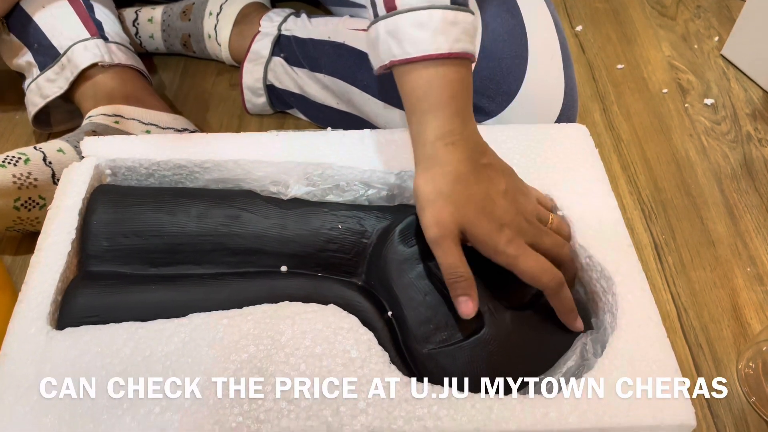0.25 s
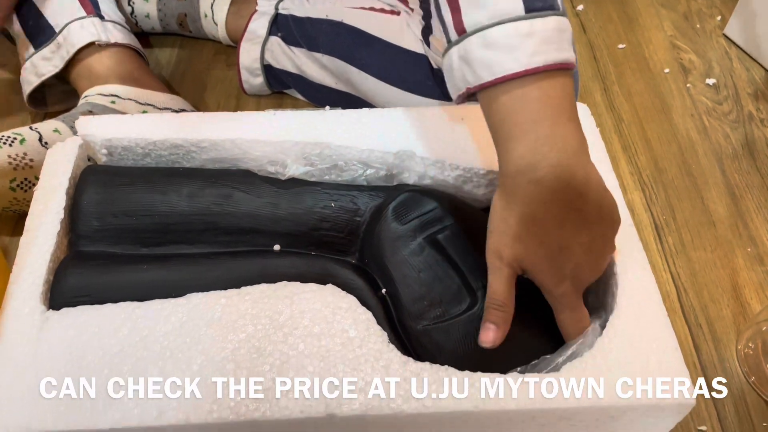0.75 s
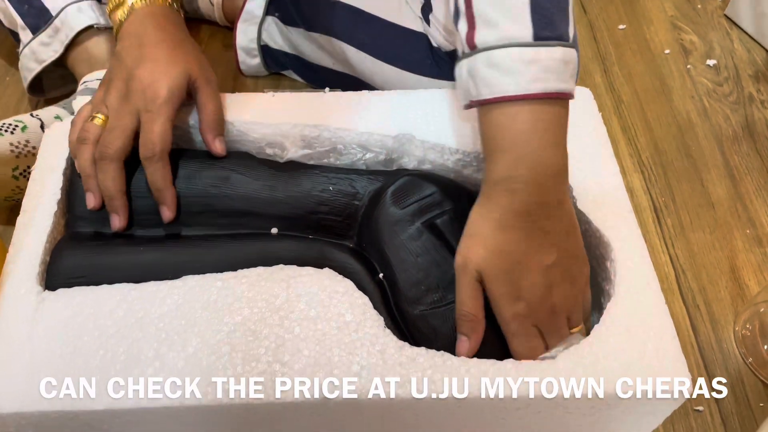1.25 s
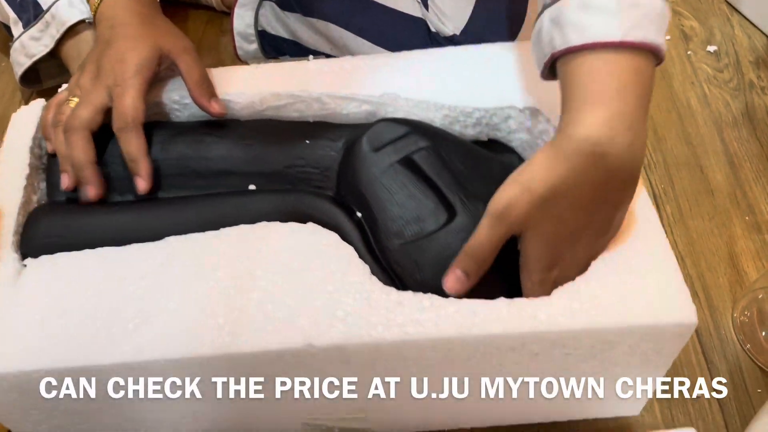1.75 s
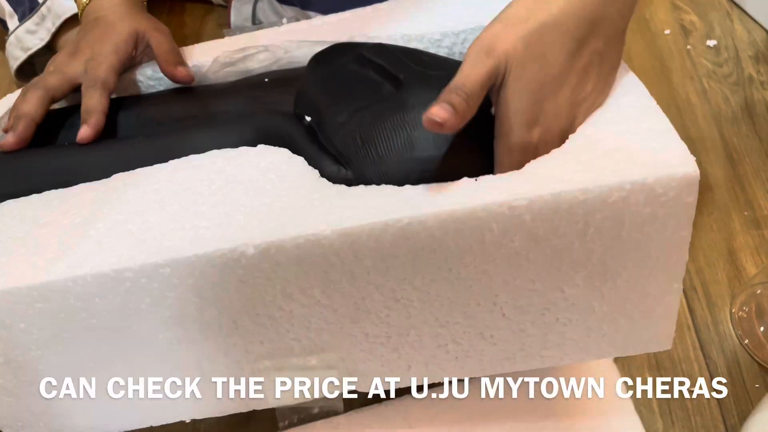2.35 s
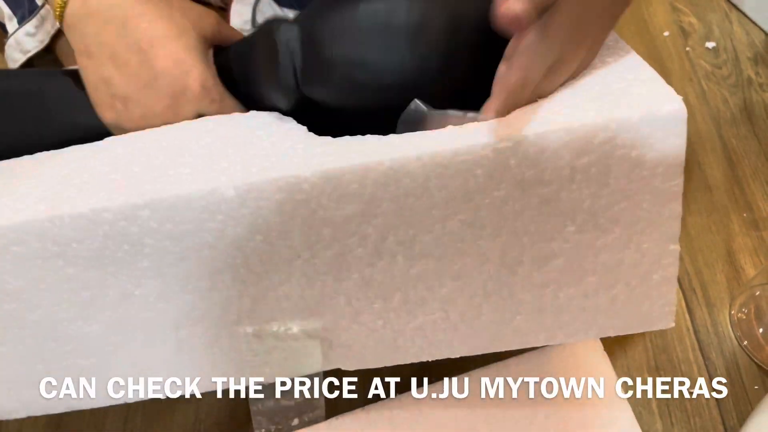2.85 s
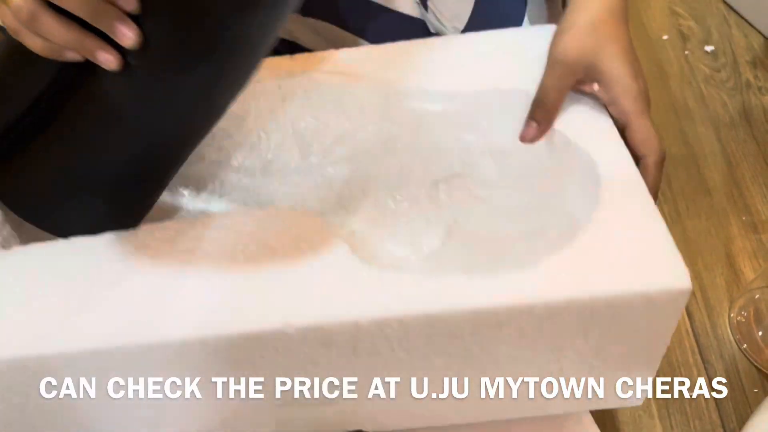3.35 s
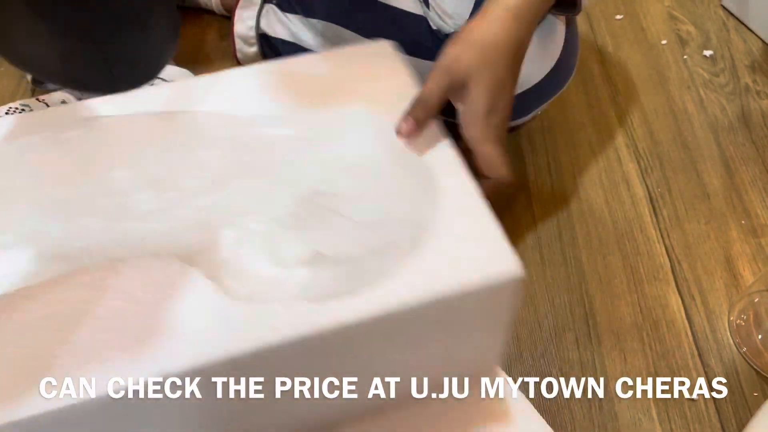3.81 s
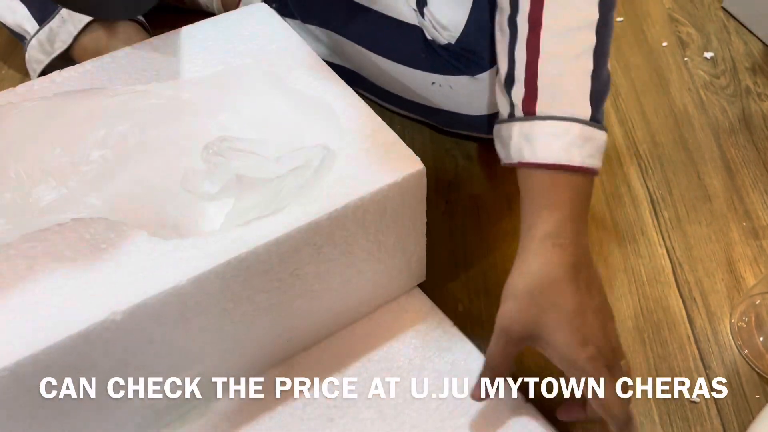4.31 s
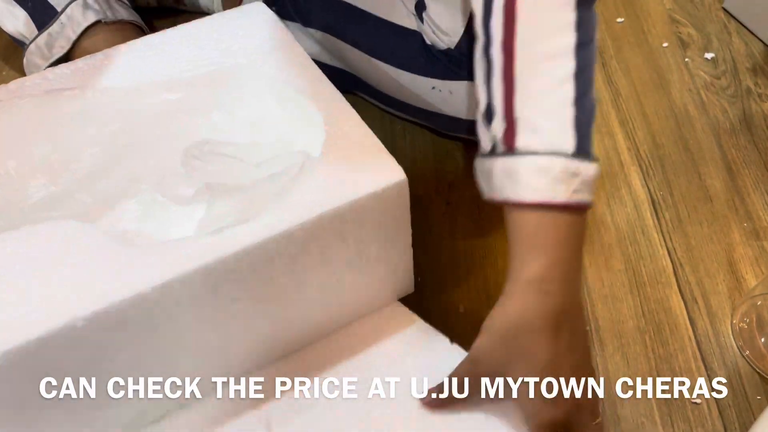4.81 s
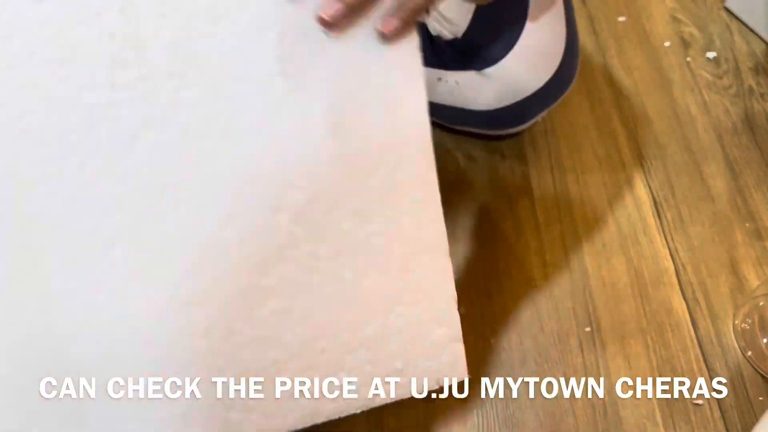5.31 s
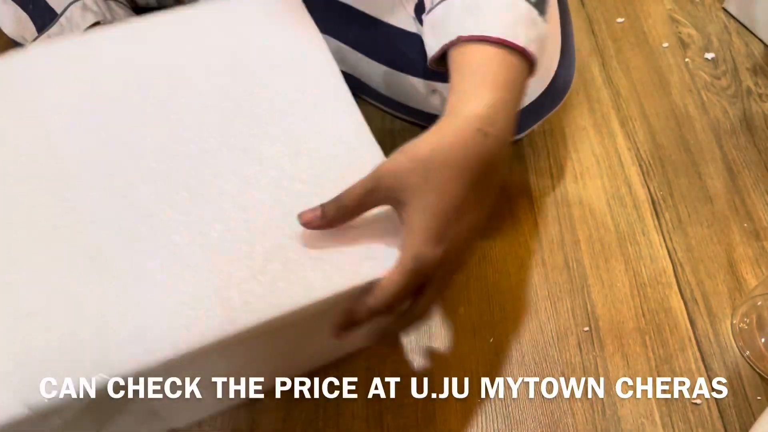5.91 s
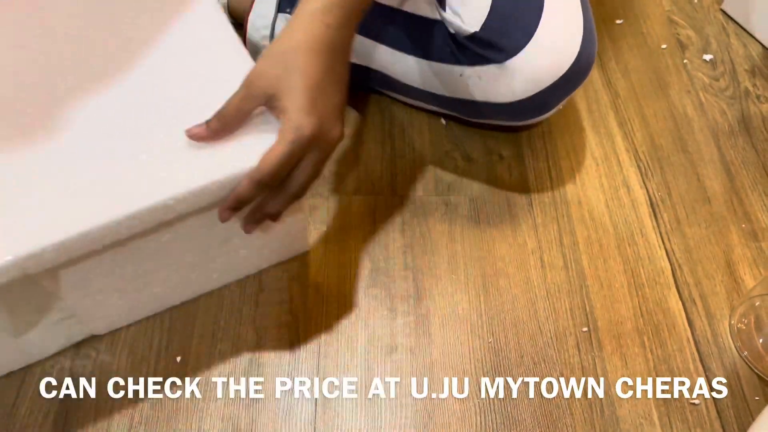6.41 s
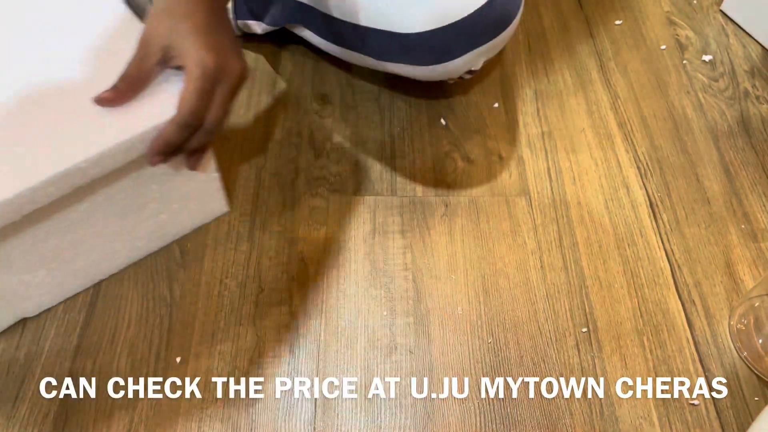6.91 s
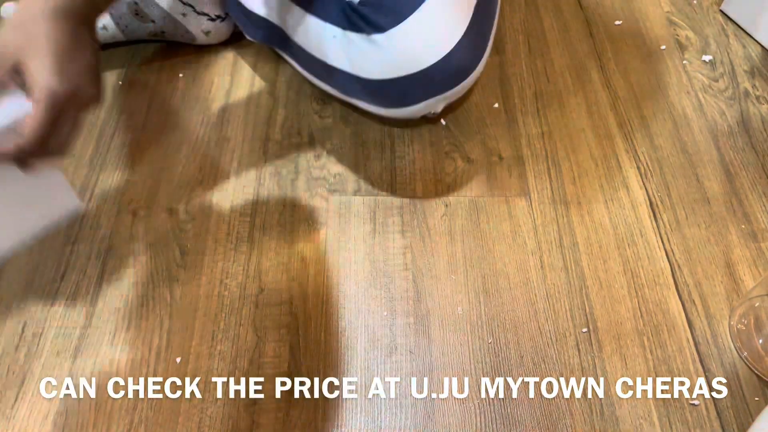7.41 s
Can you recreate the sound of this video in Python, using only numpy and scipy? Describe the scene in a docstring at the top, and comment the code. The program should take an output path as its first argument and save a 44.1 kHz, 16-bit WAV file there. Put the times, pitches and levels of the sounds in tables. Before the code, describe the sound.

Close by in a quiet room, a carving drags against its tight polystyrene packing with dry hissing scrapes and a few ticks of foam and plastic wrap. Sharp jerks and a quick cluster of rough squeaks make the loudest stretch. The handling then turns quieter, with light rubs and faint squeaks as the lid is laid on. Finally the box is pushed away, rumbling and bumping dully on the floorboards.

```python
"""Unpacking a carving from foam

A heavy carving is worked out of a polystyrene box on a wooden floor, close by in a quiet room.
Friction makes countless foam beads slip: they hiss and drive the resonances of the block and the air
in the box. Stick-slip motion against the carving gives jerks and squeaks. A lid is laid on and the
box is slid away, with a low rumble and soft thuds that ring the floorboards."""
import sys
import numpy as np
from scipy import signal
from scipy.fft import rfft, irfft, next_fast_len
from scipy.io import wavfile
from scipy.ndimage import uniform_filter1d, map_coordinates

SR = 44100
rng = np.random.default_rng(int(sys.argv[2]) if len(sys.argv) > 2 else 0)


def pcm_store(signal):
    """Save signal as 16-bit PCM."""
    levels = np.round(np.clip(np.atleast_2d(signal), -1, 1) * 32767)
    wavfile.write(sys.argv[1], SR, levels.astype(np.int16).T)


N = 337850

# Foam sliding on the carving, lid or floor:
# start_s, end_s, first_hiss_db, last_hiss_db, block_over_hiss_db, hollow_over_hiss_db
STROKES = [(0, 0.063, -39.5, -56.5, 0, -2), (0.08, 0.21, -41, -49, -1, -1),
           (0.221, 0.267, -41, -37.5, -1, -10), (0.271, 0.45, -35.5, -43, -2.5, -5.5),
           (0.464, .55, -40.5, -48, 1, -2.5), (0.557, 0.654, -41, -48, 2.5, 1),
           (0.667, .775, -38.5, -46.5, -0.5, -3), (.785, 0.936, -45, -40, -1.5, -6),
           (.95, 1.048, -47, -41, 0.5, -3), (1.052, 1.239, -31, -41.5, -5.5, -4),
           (1.234, 1.342, -36, -48, -3.5, -4.5), (1.341, 1.412, -40, -32, 1.5, -8.5),
           (1.426, 1.5, -40, -42, 1.5, -0.5), (1.513, 1.582, -38.5, -33.5, -4, -4),
           (1.588, 1.676, -30.5, -37, -1, -2), (1.674, 1.91, -37, -27, -2, -4),
           (1.934, 1.981, -41.5, -38.5, 5.5, 5), (1.983, 2.045, -31.5, -25.5, 7, -1),
           (2.058, 2.165, -31, -30.5, 0, -1), (2.173, 2.235, -31.5, -28.5, -2.5, -3.5),
           (2.235, 2.443, -25, -28, -4.5, -13.5), (2.457, 2.578, -25.5, -26, -7, -13.5),
           (2.588, 2.635, -38, -46, -3, -7), (2.639, 2.806, -24, -24, -10.5, -18),
           (2.812, 2.987, -33, -37.5, -3, -9.5), (2.993, 3.152, -40, -33.5, -6, -9),
           (3.154, 3.254, -32, -43.5, -8.5, -9.5), (3.29, 3.478, -40.5, -59.5, -5, -7.5),
           (3.488, 3.635, -59.5, -48.5, 1.5, -6.5), (3.631, 3.801, -44.5, -44.5, -6, -7.5),
           (3.794, 3.968, -42.5, -49, -4.5, -0.5), (3.986, 4.164, -51, -70, -1.5, 0.5),
           (4.175, 4.3, -48.5, -47, -7, -7.5), (4.298, 4.37, -55, -56.5, -5, -6.5),
           (4.373, 4.5, -65.5, -81, 2.5, 6), (4.596, 4.679, -52, -32.5, -9.5, -12.5),
           (4.68, 4.781, -34.5, -34, -8.5, -12.5), (4.79, 4.853, -46, -47.5, -3.5, -5),
           (4.859, 4.938, -42.5, -39, -8.5, -11.5), (4.95, 5.048, -50.5, -55, -2, -11),
           (5.071, 5.215, -51.5, -58, -2, -8), (5.225, 5.293, -54, -55.5, -1, -4),
           (5.333, 5.467, -47.5, -44, -8, -13), (5.462, 5.705, -45, -75.5, -2.5, -1),
           (5.87, 5.93, -50.5, -48.5, -8.5, -3.5), (5.925, 6.056, -39, -46, -5.5, 1.5),
           (6.065, 6.31, -53, -48.5, -2.5, -4.5), (6.298, 6.4, -47, -38.5, -4.5, 0),
           (6.405, 6.678, -41.5, -57.5, -2, 1), (6.677, 6.765, -44.5, -46.5, -6.5, -7.5),
           (6.77, 6.904, -48, -45, -7.5, -5.5), (6.902, 6.997, -42, -45.5, -7, -7),
           (7.0, 7.049, -44, -37.5, -10, 1), (7.068, 7.167, -44, -39, -11, -9.5),
           (7.175, 7.332, -47.5, -46.5, -8, -7), (7.323, 7.552, -45, -35, -5, -2.5),
           (7.552, 7.66, -37, -46.5, -4, -5.5)]
# A bead or a fold of wrap snaps: start_s, level_db, body_over_hiss_db
TICKS = [(0.082, -27.5, -12), (0.09, -27, -11), (0.127, -11.5, -8), (0.2209, -17.5, -1), (0.3868, -25, -21),
         (0.576, -27.5, -1), (0.6707, -23, -1), (0.7894, -27, -12), (0.8096, -35.5, -4),
         (1.0619, -18.5, -4), (1.246, -35.5, -3.5), (2.641, -14.5, -6.5), (3.306, -30.5, -12),
         (3.348, -39, -8.5), (4.127, -47, 5.5), (5.816, -48, -10), (6.05, -31, -13), (6.4183, -33.5, -8),
         (7.4185, -46, -3)]
# The grip builds and lets go: peak_s, hiss_db, body_over_hiss_db, rise_ms, t60_ms
SURGES = [(.577, -39.5, 8.5, 10, 40), (1.066, -30.5, -2.5, 40, 55), (1.082, -28.5, -5, 13, 120),
          (1.146, -38, 3.5, 8, 63), (1.365, -42, 1, 15, 120), (1.58, -26.5, -14.5, 18, 41),
          (1.893, -23.5, 0, 24, 77), (1.912, -27.5, 9, 11, 20), (2.038, -17, -3, 27, 50),
          (2.078, -18.5, 2, 18, 40), (2.174, -16.5, -2, 7.5, 51), (2.208, -19.5, -1.5, 24, 27),
          (2.232, -17, -2, 5, 25), (2.248, -20.5, -3, 10, 77), (2.273, -19.5, -2.5, 14, 43),
          (2.298, -23, -5.5, 6, 30), (2.478, -35.5, -8.5, 23, 130), (3.57, -51.5, 3.5, 19, 77),
          (3.807, -42, 3.5, 3, 69), (3.973, -33.5, -8.5, 11, 45), (4.187, -47.5, -5.5, 4.3, 160),
          (4.25, -42, -9, 8, 60), (4.29, -44.5, -7, 6, 73), (4.606, -49, -2.5, 4, 150),
          (4.628, -44, -8.5, 5.7, 150), (5.085, -48, -3, 8.7, 550), (5.24, -48.5, -13, 22, 230),
          (5.345, -55, 1, 6.6, 220), (5.883, -46.5, -8, 12, 95), (6.688, -47, -20, 4.1, 480),
          (7.45, -34.5, -9, 7.8, 100), (.858, -39, 0, 15, 180), (1.984, -28.5, 1.5, 4.4, 150),
          (4.69, -38.5, -11.5, 39, 93), (4.775, -39, -10.5, 34, 30), (4.803, -33.5, -15, 7.3, 34),
          (4.94, -40, -5, 71, 22), (5.482, -35, -9.5, 31, 69), (5.938, -28.5, -16, 17, 72),
          (5.998, -34.5, 1.5, 13, 71), (6.355, -41.5, -3.5, 32, 100), (7.055, -43, -0.5, 41, 33),
          (7.55, -29.5, -17.5, 30, 51)]
# Lift of the top of the hiss: time_s, gain_db
TREBLE_LIFT = [(0, -1), (.24, -5), (.4, 4), (1.2, 2), (1.45, -2), (2.1, -1), (2.37, 8), (2.7, 4),
               (2.88, -4), (3.3, 3), (3.9, 3), (4.25, 7), (4.76, 2), (5.4, 10), (5.7, 4), (6.1, 4),
               (6.33, 11), (6.45, 5), (6.69, 14), (6.8, 4), (7.1, 7), (7.66, 6)]
# How hard the foam grips: time_s, rasp_over_hiss_db
GRIP_STRENGTH = [(2.16, -20), (2.26, -12), (2.34, -5), (2.4, -13), (2.5, -8), (2.64, -16), (2.73, -6),
                 (2.77, -16), (3.0, -12), (3.12, -7), (3.25, -16), (3.4, -40), (4.55, -40), (4.65, -14),
                 (4.95, -14)]
# Resonances of gripped foam, the foam block and the air in the box: centre_hz, width_hz, gain_db
GRIP_MODES = [(2500, 130, -3), (2950, 150, -3), (3580, 110, -7), (4120, 280, 2), (4800, 90, -7),
              (5420, 170, -3), (6600, 180, -4)]
BLOCK_MODES = [(830, 101, 3.5), (1170, 286, 4.5), (1427, 336, 2.5), (1720, 71, -1)]
HOLLOW_MODES = [(278.7, 68, 1.5), (441, 212, 0), (664, 324, -2.5)]
# Stick-slip squeaks: start_s, end_s, first_pitch_hz, last_pitch_hz, level_db, overtones_db, roughness
SQUEAKS = [(.825, 0.92, 1424, 1360, -42, -8, 0.95), (1.558, 1.604, 861, 867, -32, -6, 0.38),
           (2.185, 2.212, 1098, 1050, -20.5, -1, 0.45), (2.242, 2.262, 1250, 1200, -20, -6, .7),
           (2.262, 2.3, 1400, 1330, -20, -2, .6), (2.305, 2.348, 1310, 1345, -20, 0, .42),
           (2.347, 2.37, 1377, 1480, -25.5, 0.5, 0.42), (2.362, 2.402, 1483, 1470, -25, -1.5, 0.13),
           (2.4, 2.434, 1470, 1400, -37, -2, 1), (2.465, 2.487, 1335, 1400, -31.5, -1, .6),
           (2.482, 2.505, 1473, 1480, -24.5, 0.5, 0.28), (2.504, 2.551, 1390, 1261, -28.5, 0, .55),
           (2.547, 2.579, 1430, 1386, -29, -2.5, 0.48), (2.64, 2.675, 1330, 1895, -26.5, -3, 0.17),
           (2.668, 2.71, 2095, 2180, -27.5, -3, 0.3), (2.703, 2.726, 2300, 2544, -29, -6.5, 0.2),
           (2.712, 2.742, 1850, 1710, -34, 3, .5), (2.743, 2.778, 1665, 1714, -28, -5.5, 0.5),
           (2.773, 2.794, 2050, 2220, -29.5, -7, 0.2), (2.788, 2.822, 2520, 2533, -29, -7.5, 0.1),
           (2.67, 2.727, 817, 830, -32, -8, .7), (2.75, 2.777, 856, 800, -34, -13, 0.5),
           (2.785, 2.812, 796, 844, -31, -10, 0.6), (2.84, 2.862, 783, 725, -29.5, -11, 0.36),
           (2.865, 2.9, 479, 447, -37.5, 1, 0.63), (2.895, 2.905, 800, 815, -28, -17, 0.3),
           (2.915, 2.947, 808, 798, -38, -14, 0.8), (3.018, 3.045, 830, 830, -36, -10, .6),
           (3.09, 3.16, 2600, 2650, -43, -10, .95), (3.18, 3.245, 830, 830, -44, -10, .6),
           (3.545, 3.619, 1136, 1064, -48.5, -4.5, 0.61), (4.645, 4.725, 805, 783, -47, -6, 0.9),
           (4.72, 4.788, 811, 774, -43, 1, 0.67), (4.905, 4.937, 777, 775, -47.5, -6, 0.4)]
# Harmonics of the slip pulse: harmonic_number, level_db
SLIP_OVERTONES = [(2, -5), (3, -4), (4, -13), (5, -13)]
# Blows on the floor: start_s, peak_db, hardness_db_per_octave
THUDS = [(.124, -36, 12), (1.405, -24, -4), (3.292, -38.5, -3), (3.56, -44, -6), (3.806, -39, 5),
         (3.958, -30, -10), (5.365, -41, -6), (5.49, -36.5, 6), (5.931, -32.5, -1), (5.995, -35, 3),
         (6.418, -33.5, 12), (7.125, -39, -1), (7.173, -33, 3), (7.344, -37, 3), (7.444, -28.5, -2.5),
         (7.545, -17.5, 0), (7.596, -28, 0)]
# Modes of the floor and box: pitch_hz, level_db, t60_s
BOARD_MODES = [(76.4, 1, .13), (99.8, -7, 0.16), (147.4, -2, 0.093), (235.5, -4, 0.071), (320, -7, 0.049)]
# The lifted hollow carving rings once: start_s, pitch_hz, level_db, t60_s
CARVING_HUM = (3.345, 156, -47, .6)
# Floor rumble under the moving box: time_s, level_db
RUMBLE_LEVEL = [(0, -46), (.6, -49.5), (1.2, -45.5), (1.5, -46.5), (2.25, -49), (2.6, -58.5), (3.3, -60.5),
                (3.8, -53.5), (4.4, -57), (5.2, -56.5), (5.7, -58.5), (6.0, -57), (6.35, -53), (6.6, -54.5),
                (6.9, -51), (7.3, -52), (7.5, -42), (7.66, -39.5)]
# Spectral shapes of the rumble and of the quiet room: frequency_hz, density_db
RUMBLE_SPECTRUM = [(15, -48), (25, -13.5), (64, -1), (92, 3.5), (276, -8), (332, -11.5), (400, -16.5),
                   (520, -14), (880, -120)]
HUSH_SPECTRUM = [(88, -27.5), (150, -3.5), (187, -17.5), (319, -17), (372, -12), (506, -14), (1280, -20),
                 (3000, -35), (9000, -53.5), (11700, -75.5), (19800, -120)]
# Reverberation, scaled for each source: frequency_hz, base_t60_s
ROOM_DECAY = [(200, 0.25), (2000, 0.34), (10000, 0.068)]
# Colour of left plus right (mid) and left minus right (side): frequency_hz, gain_db
MID_COLOUR = [(700, -89.5), (1300, -7), (1900, 1.5), (3300, 1), (4200, 3), (6700, -1.5), (7500, -4.5),
              (7800, -45.5), (8700, -25.5), (9200, -9), (10900, -6), (13600, -13.5), (14100, -44),
              (16500, -48)]
SIDE_COLOUR = [(700, -92.5), (1300, -0.5), (1900, 8), (2400, -1), (3550, -0.5), (5200, -0.5), (6000, -2.5),
               (7900, 2.5), (10100, -6), (10600, -29), (12700, -30), (13300, -9), (15700, -5),
               (16200, -34.5)]
# Direct sound in the side signal: frequency_hz, signed_share
DIRECT_SHARE = [(300, -.15), (600, .2), (1200, 0), (2400, .5), (4500, .6), (6500, .3), (9000, 0)]
# Stereo width of low sounds: frequency_hz, side_over_mid_db
LOW_WIDTH = [(60, -19), (125, -13), (250, -14), (500, -11), (1000, -7), (1900, -3)]

TAKE_HOLD_S, LET_GO_T60_S = .016, .08
TICK_RISE_MS, TICK_T60_MS = 1.5, 16
TREBLE_FROM_HZ, TOP_HZ = 8200, 16300


def rubbing():
    """Friction noise: bead slips radiate hiss directly and force the block and box at their resonances."""
    sliding, block, hollow = stroke_envelopes()
    jerk_power, body_power = jerk_powers()
    hiss = np.sqrt(sliding ** 2 + jerk_power)
    block = np.sqrt(block ** 2 + body_power)
    hollow = np.sqrt(hollow ** 2 + amp(-11) * body_power)
    return foam_hiss(hiss, sliding) + box_resonance(block, hollow)


def stroke_envelopes():
    """Incoherent sources add in power: overlapping strokes give hiss, block and hollow amplitudes."""
    power = np.zeros((3, N))
    for start, end, first_db, last_db, block_db, hollow_db in STROKES:
        span = slice(max(round((start - TAKE_HOLD_S / 2) * SR), 0), round((end + LET_GO_T60_S) * SR))
        t = np.arange(N)[span] / SR
        release_db = 60 * np.maximum(t - end, 0) / LET_GO_T60_S
        level_db = np.interp(t, [start, end], [first_db, last_db]) - release_db
        force = np.clip((t - start) / TAKE_HOLD_S + .5, 0, 1) * amp(level_db)
        power[:, span] += (amp([[0], [block_db], [hollow_db]]) * force) ** 2
    stutter = amp(-2 + wobble(60))
    return np.sqrt(power) * stutter


def jerk_powers():
    """Stress builds linearly and relaxes exponentially: hiss and body power of ticks and surges."""
    power = np.zeros((2, N + 2 * SR))
    lead = SR // 10
    t_ms = 1000 * np.arange(-lead, SR // 3) / SR
    ticks = [(start + .001, db - 6.5, body_db, TICK_RISE_MS, TICK_T60_MS) for start, db, body_db in TICKS]
    for peak_s, db, body_db, rise_ms, t60_ms in ticks + list(SURGES):
        shape = np.clip(1 + t_ms / rise_ms, 0, 1) * amp(-60 * np.maximum(t_ms, 0) / t60_ms)
        first = round(peak_s * SR) + SR - lead
        power[:, first:first + len(t_ms)] += (amp([[db], [db + body_db]]) * shape) ** 2
    return power[:, SR:SR + N]


def bead_slips(spread_db, patchy_db):
    """Superposition of countless uneven slips gives noise with shifting patches of colour."""
    slips = rng.standard_normal(N) * amp(spread_db * wobble(900))
    spectrum = signal.stft(slips, nperseg=256)[2]
    patches = uniform_filter1d(rng.standard_normal(spectrum.shape), 3, axis=0)
    patches = unit(uniform_filter1d(patches, 8, axis=1))
    return unit(signal.istft(spectrum * amp(patchy_db * patches), nperseg=256)[1][:N])


def foam_hiss(level, sliding):
    """Direct radiation from the beads is broadband; tightly gripped foam adds a resonant rasp."""
    t = np.arange(N) / SR
    gripping = (t > GRIP_STRENGTH[0][0]) & (t < GRIP_STRENGTH[-1][0])
    grip = sliding * amp(over_time(GRIP_STRENGTH)) * gripping
    lift = amp(over_time(TREBLE_LIFT)) - 1
    paths = []
    for _ in range(2):
        slips = bead_slips(spread_db=1.5, patchy_db=2.5)
        treble = filtered(slips, lambda hz: hz > TREBLE_FROM_HZ)
        paths.append(level * (slips + lift * treble) + grip * ring(slips, GRIP_MODES))
    paths[0] += amp(-14.5) * reverb(paths[0], t60_scale=1.28)
    return stereo(*paths, lambda hz: along(MID_COLOUR, hz) + 5, lambda hz: along(SIDE_COLOUR, hz) + 2.3)


def box_resonance(block, hollow):
    """Forced vibration: slip noise excites the modes of the foam block and the enclosed air."""
    paths = []
    for _ in range(2):
        slips = bead_slips(spread_db=3, patchy_db=2.2)
        paths.append(block * ring(slips, BLOCK_MODES) + hollow * ring(slips, HOLLOW_MODES))
    paths[0] += amp(-15) * reverb(paths[0], t60_scale=.72)
    return low_stereo(*paths)


def squeaking():
    """Stick-slip oscillation makes a harmonic pulse train, ragged and raspy where the contact is rough."""
    tone, rasp = np.zeros((2, N))
    waver = wobble(110) + .8 * wobble(500)
    flutter, grit = wobble(220), rng.standard_normal(N)
    for start, end, first_hz, last_hz, db, overtones_db, roughness in SQUEAKS:
        span = slice(round(start * SR), round(end * SR))
        progress = np.linspace(0, 1, span.stop - span.start)
        glide_hz = first_hz + (last_hz - first_hz) * progress
        slip_hz = glide_hz * (1 + .05 * (roughness + .1) * waver[span])
        phase = 2 * np.pi * np.cumsum(slip_hz) / SR
        arch = np.sin(np.pi * progress) ** .4
        force = np.sqrt(2) * amp(db + 4 * (roughness + .2) * flutter[span]) * arch
        overtones = sum(amp(level + overtones_db) * np.cos(k * phase) for k, level in SLIP_OVERTONES)
        tone[span] -= force * (np.cos(phase) + overtones)
        rasp[span] += force * amp(overtones_db) * (1 + np.cos(phase)) * grit[span]  # slips tear beads
    squeak = filtered(tone, lambda hz: 1 + .5 * np.abs(resonance(GRIP_MODES, hz)))
    squeak += amp(1.5) * filtered(rasp, lambda hz: resonance(GRIP_MODES, hz))
    near = squeak + amp(-9.5) * reverb(squeak, t60_scale=1)
    mid_db = lambda hz: np.minimum(along(MID_COLOUR, np.maximum(hz, 6000)) + 6, 0)
    side_db = lambda hz: np.minimum(along(LOW_WIDTH, hz), along(SIDE_COLOUR, np.maximum(hz, 6000))) - 1.5
    return stereo(near, reverb(squeak, t60_scale=.15), mid_db, side_db)


def thuds_and_hum():
    """Free vibration: harder blows favour the boards' upper modes; the carving rings in a single mode."""
    sound, t = np.zeros(N + SR), np.arange(SR // 2) / SR
    lowest_hz = BOARD_MODES[0][0]
    for start, peak_db, hardness in THUDS:
        thud = np.zeros(len(t))
        for hz, db, t60 in BOARD_MODES:
            tilt_db = hardness * np.log2(hz / lowest_hz)
            thud += damped_mode(t, hz, db + tilt_db + rng.normal(0, 1.5), t60)
        sound[round(start * SR):][:len(t)] += amp(peak_db) * thud / np.abs(thud).max()
    start, hz, db, t60 = CARVING_HUM
    sound[round(start * SR):][:len(t)] += damped_mode(t, hz, db, t60)
    return low_stereo(sound[:N], amp(-7) * reverb(sound[:N], t60_scale=.5))


def floor_rumble():
    """Structure-borne noise: the moving box shakes the floor at low frequencies."""
    return amp(over_time(RUMBLE_LEVEL) - 1 + 2.6 * wobble(12)) * coloured_noise(RUMBLE_SPECTRUM)


def room_hush():
    """Stationary noise forms the faint background of the room."""
    return amp(-67.5) * coloured_noise(HUSH_SPECTRUM)


def amp(db):
    """Amplitude ratio of a level in decibels."""
    return 10 ** (np.asarray(db) / 20)


def unit(x):
    """Normalisation to an rms of 1."""
    return x / np.sqrt(np.mean(x ** 2) + 1e-20)


def along(points, hz):
    """Interpolation on a logarithmic frequency axis."""
    knots_hz, values = np.transpose(points)
    return np.interp(np.log(hz + 1), np.log(knots_hz + 1), values)


def over_time(points):
    """Linear interpolation in time, one value per sample."""
    return np.interp(np.arange(N) / SR, *np.transpose(points))


def wobble(rate_hz):
    """Smooth random modulation: a spline through rate_hz knots a second."""
    knots = rng.standard_normal(int(N * rate_hz / SR) + 4)
    return map_coordinates(knots, [np.arange(N) * rate_hz / SR])


def filtered(x, response):
    """Linear filtering multiplies the spectrum by a frequency response."""
    size = next_fast_len(N + SR // 2)
    return irfft(rfft(x, size) * response(np.fft.rfftfreq(size, 1 / SR)), size)[..., :N]


def resonance(modes, hz):
    """Modal superposition: second-order resonators add with alternating sign."""
    return sum((-1) ** k * amp(db) * 1j * hz * width / (centre ** 2 - hz ** 2 + 1j * hz * width)
               for k, (centre, width, db) in enumerate(modes))


def ring(x, modes):
    """Forced response of the modes to x, at unit rms."""
    return unit(filtered(x, lambda hz: resonance(modes, hz)))


def damped_mode(t, hz, db, t60):
    """A damped sinusoid that builds over about one cycle, so deep modes arrive last."""
    onset = 1 - np.exp(-(t * hz / .6) ** 2)
    return amp(db - 60 * t / t60) * np.sin(2 * np.pi * hz * t) * onset


def coloured_noise(spectrum):
    """Spectral shaping of two independent white noises, mixed to narrow stereo."""
    gain = lambda hz: amp(along(spectrum, hz))
    return low_stereo(*[unit(filtered(rng.standard_normal(N), gain)) for _ in range(2)])


def reverb(x, t60_scale):
    """Reverberation: convolution with a noise tail in which each frequency decays at its own rate."""
    hz, t, spectrum = signal.stft(rng.standard_normal(SR // 2), SR, nperseg=128)
    t60 = t60_scale * along(ROOM_DECAY, hz)[:, None]
    tail = signal.istft(spectrum * amp(-60 * t / t60), SR, nperseg=128)[1]
    return signal.fftconvolve(x, tail / np.linalg.norm(tail))[:N]


def stereo(direct, diffuse, mid_db, side_db):
    """Partial coherence: the mid carries the direct sound, the side blends it with a diffuse path."""
    share = lambda hz: along(DIRECT_SHARE, hz)
    mid = filtered(direct, lambda hz: amp(mid_db(hz)))
    side = filtered(direct, lambda hz: amp(side_db(hz)) * share(hz))
    side += filtered(diffuse, lambda hz: amp(side_db(hz)) * np.sqrt(1 - share(hz) ** 2))
    return np.array([mid + side, mid - side])


def low_stereo(direct, diffuse):
    """Long wavelengths reach both channels nearly alike."""
    return stereo(direct, diffuse, np.zeros_like, lambda hz: along(LOW_WIDTH, hz))


def scene():
    """Superposition: the pressures of all sources add in each channel."""
    return rubbing() + squeaking() + thuds_and_hum() + floor_rumble() + room_hush()


def record(dry):
    """Saturation rounds the loudest peaks; band limiting thins the deepest bass and cuts the top."""
    rounded = dry / (1 + np.abs(dry / .95) ** 6) ** (1 / 6)
    return filtered(rounded, lambda hz: (hz < TOP_HZ) / (1 + (35 / (hz + 1)) ** 3))


dry = scene()
out = record(dry)
pcm_store(out)
```